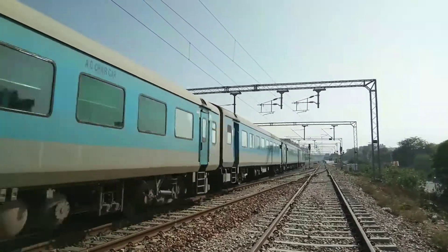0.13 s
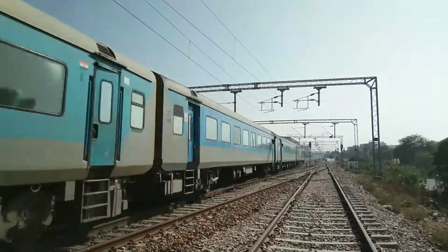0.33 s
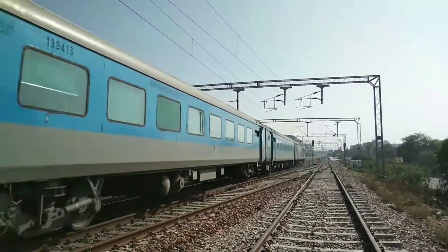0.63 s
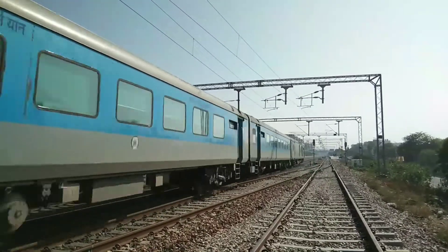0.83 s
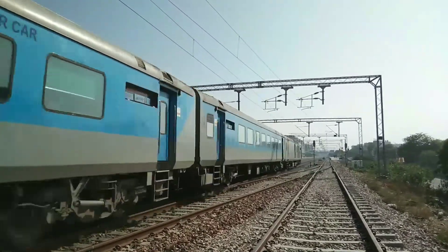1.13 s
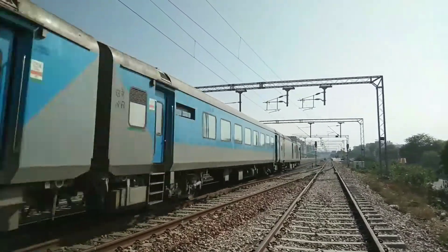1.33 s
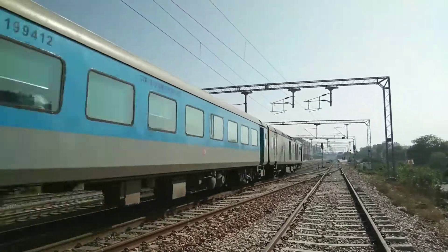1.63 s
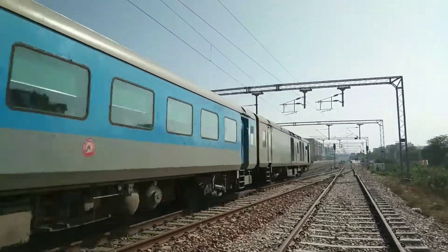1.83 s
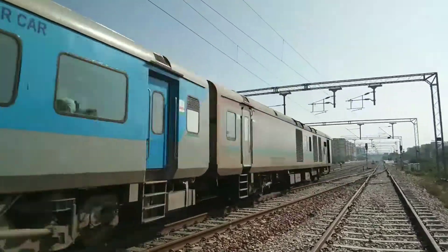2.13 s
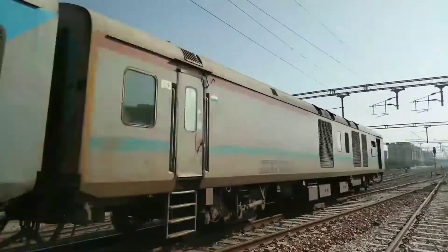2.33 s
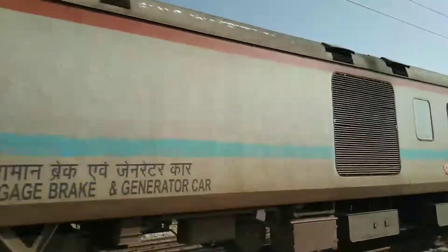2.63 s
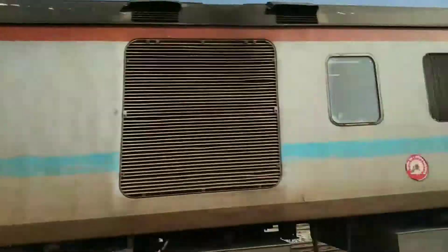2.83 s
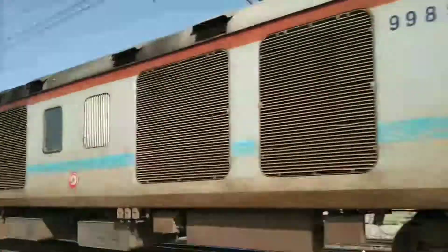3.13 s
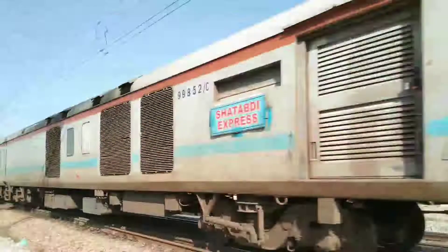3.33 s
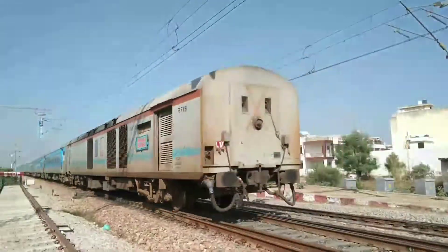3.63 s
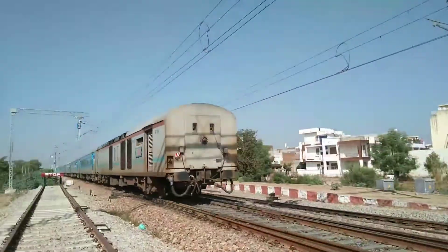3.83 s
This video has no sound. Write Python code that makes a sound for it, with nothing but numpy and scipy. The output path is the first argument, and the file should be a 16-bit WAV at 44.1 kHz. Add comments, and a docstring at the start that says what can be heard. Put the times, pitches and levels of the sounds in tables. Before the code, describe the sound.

A train passes close with a rolling roar, clattering wheels and short metallic squeals.

```python
"""Passenger train passing on open track.

The last coaches go by a few metres away. Each bogie swells the rumble and the roar of rough steel
rolling on the rail; wheels knock and the running gear rattles. Some wheels scrape the rail and sing,
their pitch lowered by the Doppler effect as they pass. All eases after the last car."""
import sys
import numpy as np
from scipy import signal
from scipy.fft import rfft, irfft
from scipy.io import wavfile
from scipy.ndimage import uniform_filter1d, map_coordinates

SR = 44100
rng = np.random.default_rng(int(sys.argv[2]) if len(sys.argv) > 2 else 0)


def wav_record(signal):
    """Record a signal, one row per channel, as 16-bit PCM in the file named by sys.argv[1]."""
    frames = np.transpose(np.atleast_2d(signal))
    bounded = np.clip(frames, -1, 1)
    # unit amplitude maps onto the largest positive 16-bit level
    quanta = np.round(bounded * 32767).astype(np.int16)
    wavfile.write(sys.argv[1], SR, quanta)


N = 176400
TIME, FREQ = np.arange(N) / SR, np.fft.rfftfreq(N, 1 / SR)
DOPPLER_FALL_PER_S = 0.29


# Vibration of coach bodies and bogies. Each row: time in seconds, relative level in dB.
COACH_LEVEL = [(0.0, -24), (0.07, -28), (0.93, -30), (0.96, -26), (1.61, -33), (1.65, -28.5), (3.5, -36),
               (4.0, -42)]
BOGIE_LEVEL = [(0.0, -33), (0.05, -22.5), (0.14, -33), (0.56, -19), (0.59, -24.5), (0.96, -20.5),
               (0.98, -25.5), (2.0, -27), (2.04, -33.5), (2.23, -22), (2.54, -27), (2.75, -21.5),
               (2.82, -25.5), (3.02, -31.5), (3.31, -20.5), (3.38, -32), (3.95, -44.5), (4.0, -39)]
# Their spectra. Each row: frequency in Hz, gain in dB.
COACH_SPECTRUM = [(15, -57), (35, -29), (48, -9), (60, -5), (85, 2), (110, -4), (160, -12.5), (400, -73)]
BOGIE_SPECTRUM = [(50, -45), (95, -9.5), (140, 1.5), (245, -1), (300, -6.5), (400, -15.5), (550, -24),
                  (1500, -81.5)]

def rumble():
    """Structural vibration: the coach bodies drone and each passing bogie swells the rumble."""
    coaches = steadied(noise(COACH_SPECTRUM), window_s=0.43) * level(COACH_LEVEL)
    bogies = steadied(noise(BOGIE_SPECTRUM), window_s=0.082) * level(BOGIE_LEVEL)
    return coaches + bogies * amp(-0.5)


# Rolling roar, treble sizzle and faint top fizz. Each row: time in seconds, relative level in dB.
ROAR_LEVEL = [(0.0, -40.5), (0.31, -39.5), (0.49, -37), (1.21, -40), (1.61, -42.5), (2.21, -39),
              (2.33, -42.5), (2.73, -41), (2.93, -40.5), (3.25, -39), (3.88, -45), (4.0, -47.5)]
SIZZLE_LEVEL = [(0, -44.5), (.4, -44), (.72, -47), (1.0, -41.5), (1.13, -49), (1.9, -40), (2.05, -46),
                (2.3, -38), (2.8, -40.5), (3.0, -52), (3.22, -48.5), (3.45, -51.5), (3.6, -54), (3.72, -56),
                (3.86, -72), (4, -49.5)]
FIZZ_LEVEL = [(0, -72), (.15, -65), (.6, -66), (.7, -77), (.83, -64), (1.1, -61), (1.85, -56.5),
              (2.05, -65), (2.85, -57), (3.0, -66.5), (3.12, -73.5), (3.21, -63.5), (3.35, -84),
              (3.41, -64), (3.62, -74), (3.75, -78), (3.89, -82), (4, -76)]
# Their spectra. Each row: frequency in Hz, gain in dB.
ROAR_SPECTRUM = [(150, 9.5), (400, -3.5), (650, 2.5), (1000, -4), (1400, -10), (2500, -18), (4000, -18),
                 (6000, -34.5), (16000, -73)]
SIZZLE_SPECTRUM = [(1000, -4.5), (2800, 0.5), (4000, -0.5), (4600, 1.5), (5300, -3.5), (6500, -17.5),
                   (8200, -28.5), (10000, -42), (15500, -47)]
FIZZ_SPECTRUM = [(4500, -16), (6300, 6), (8100, 5.5), (10300, -2.5), (11800, -2), (15500, 7.5)]

def rolling():
    """Roughness excitation: steel rolling on steel drives the rail over a broad band."""
    roar = (rattle() * amp(-4.5) + noise(ROAR_SPECTRUM, rail())) * level(ROAR_LEVEL)
    sizzle = noise(SIZZLE_SPECTRUM, rail()) * level(SIZZLE_LEVEL) * amp(-6)
    fizz = noise(FIZZ_SPECTRUM) * level(FIZZ_LEVEL) * flutter(depth_db=2, rate_hz=35)
    return (roar + sizzle + fizz) * flutter(depth_db=1.5, rate_hz=30)


def rattle(taps_per_s=110, spread_db=2):
    """Poisson impacts: loose running gear taps at random, each tap a decaying burst of noise."""
    taps = (rng.random(N) < taps_per_s / SR) * amp(spread_db * rng.random(N))
    shake = signal.fftconvolve(taps, burst(0, rise=1 / SR, hold=0, t60=0.031))[:N]
    return shaped(shake * rng.standard_normal(N), colour(ROAR_SPECTRUM) * rail())


# Peaks and dips of the rail's response. Each row: frequency in Hz, width in Hz, gain in dB.
RAIL_RESONANCES = [(1788, 100, 4), (2215, 37, -3), (2694, 67, 2.5), (3930, 160, -2), (4600, 170, -1.5)]

def rail():
    """Resonance: the rail lifts some narrow bands and weakens others."""
    return amp(sum(db / (1 + (2 * (FREQ - hz) / width) ** 2) for hz, width, db in RAIL_RESONANCES))


# Wheel impacts. Each row: start in seconds, relative level in dB, thud offset in dB,
# time for the clank to decay by 60 dB in seconds.
IMPACTS = [(0.038, -28.5, 13, 0.093), (.076, -28.5, 9, 0.074), (0.094, -26.5, -6, 0.042),
           (.18, -26, -4, 0.075), (.408, -25.5, 8.5, 0.25), (.499, -26.5, -12, 0.073),
           (0.543, -30, 18, 0.1), (0.635, -32.5, 5, .1), (0.828, -23.5, 1, 0.17), (.9, -33, 21, 0.12),
           (0.935, -26, 17.5, .14), (.954, -33.5, 20, 0.48), (1.024, -32.5, 19, 0.17),
           (1.063, -24.5, -1, 0.16), (1.256, -32, 10, .12), (1.32, -27.5, -9, 0.26),
           (1.388, -25.5, 7, 0.15), (1.414, -26.5, 9, .14), (1.487, -29.5, 17, 0.14),
           (1.742, -28.5, 15, 0.43), (1.83, -27, 15, 0.24), (1.874, -25.5, 8, .16), (1.957, -25, -10, 0.22),
           (2.216, -26, 8, 0.1), (2.297, -23.5, 6, 0.32), (2.389, -25, 14, 0.1), (2.409, -24, -7, .18),
           (2.623, -24, 0, 0.15), (2.654, -33, 13, .14), (2.723, -20.5, 14, .15), (2.771, -27, 13, 0.21),
           (2.868, -27.5, 3, 0.21), (2.918, -36.5, 12.5, 0.045), (3.034, -35.5, -12, .08),
           (3.132, -36, -3, 0.36), (3.193, -25, 14.5, 0.22), (3.28, -26.5, -1, 0.06),
           (3.3, -28, 15.5, 0.089), (3.587, -34.5, 9, 0.33), (3.706, -34, 6, 0.18), (3.896, -38.5, -4, .13)]
# Spectrum of the clank. Each row: frequency in Hz, gain in dB.
CLANK_SPECTRUM = [(150, -42), (400, 10.5), (800, 1.5), (1300, -4), (2300, -11), (4400, -15.5), (6500, -32),
                  (10000, -60), (16000, -49)]

def knocks(thud_hz=232.3, thud_spread=0.17):
    """Impact excitation: a wheel strikes, giving a clank in the rail and a thud in the track bed."""
    out, steel = np.zeros(N), noise(CLANK_SPECTRUM, rail())
    for start, db, thud_db, t60 in IMPACTS:
        at = slice(int(start * SR), int(start * SR) + SR // 2)
        t = TIME[at] - start
        clank = steel[at] * envelope(t, rise=0.0015, hold=0.0088, t60=t60)
        hz = thud_hz * np.exp(thud_spread * rng.standard_normal())
        thud = np.sin(2 * np.pi * hz * t) * envelope(t, rise=0.0049, hold=0.0049, t60=0.058)
        out[at] += clank * amp(db - 8) + thud * amp(db + thud_db - 3)
    return out


# Natural modes of a wheel. Each row: frequency in Hz, relative level in dB.
WHEEL_MODES = [(1870, -2), (2230, -1), (2520, -2.5), (2760, -2.5), (3620, 2.5), (3980, 4.5), (4700, 4.5),
               (5220, -5.5), (5650, -4), (6100, -7.5), (6600, -7), (7500, -16), (8250, -12.5), (9800, -18)]

def ringing(fall_per_s=0.15, spread=0.02, rolloff_hz=2620):
    """Free vibration: each knock leaves the lower wheel modes ringing briefly, sinking in pitch."""
    out, t = np.zeros(N + SR), TIME[:SR // 2]
    glide = np.cumsum(np.exp(-fall_per_s * t)) / SR
    fade = envelope(t, rise=0.008, hold=0, t60=0.28)
    for start, db, _, _ in IMPACTS:
        for hz, mode_db in WHEEL_MODES[:8]:
            detune, sine, cosine = rng.standard_normal(3)
            phase = 2 * np.pi * hz * (1 + spread * detune) * glide
            gain = amp(db + mode_db - 19) / (1 + (hz / rolloff_hz) ** 4)
            out[int(start * SR):][:len(t)] += gain * fade * (sine * np.sin(phase) + cosine * np.cos(phase))
    return out[:N]


def wheel(spread=0.012, relative_width=0.008):
    """Modal response: a sum of narrow resonances, with no two wheels tuned quite alike."""
    tuning = 1 + spread * rng.standard_normal(len(WHEEL_MODES))
    return sum(amp(db) / (1 + (2 * (FREQ / (hz * ratio) - 1) / relative_width) ** 2)
               for (hz, db), ratio in zip(WHEEL_MODES, tuning))


# Flange contacts. Each row: start in seconds, length in seconds, level in dB,
# hiss offset in dB, singing offset in dB.
FLANGE_CONTACTS = [(.215, 0.023, -51.5, -3, -7), (0.292, 0.21, -46, -5, -1.5),
                   (.97, 0.038, -50.5, -9, -0.5), (1.172, 0.21, -46, -1, -2), (1.473, 0.24, -45, -1, -4),
                   (2.085, 0.21, -43, -6, -1.5), (2.399, 0.045, -40.5, -16, -11),
                   (2.508, 0.016, -36.5, -11, -9), (2.556, .19, -45, -12, -1.5),
                   (2.802, 0.0096, -40, -13, -7), (3.5, 0.093, -57.5, -13, -1), (3.926, 0.078, -66, 0, -8)]
# Spectra of the rub and its top hiss. Each row: frequency in Hz, gain in dB.
RUB_SPECTRUM = [(900, -13), (1800, -3), (3000, -1), (4600, 5.5), (5500, -2), (6800, -8.5), (8200, -9),
                (10000, -23.5), (16000, -34)]
HISS_SPECTRUM = [(4000, -28), (7000, -2), (9500, -4), (10800, -7.5), (12200, -2), (14000, 3), (15500, 1.5)]

def scrapes(mode_gap_hz=170, ripple_db=3.8, sag_db_per_s=22):
    """Sliding friction: a flange rubs the rail, and the gritty rub sags as the wheel modes sing."""
    out, friction = np.zeros(N), noise(RUB_SPECTRUM, rail() ** 1.4)
    modes_hz = np.arange(0, SR / 2, mode_gap_hz)
    for start, length, db, hiss_db, sing_db in FLANGE_CONTACTS:
        ripple = amp(ripple_db * np.interp(FREQ, modes_hz, rng.standard_normal(len(modes_hz))))
        sag_db = sag_db_per_s * np.maximum(TIME - start, 0)
        rub = friction * burst(start, rise=0.012, hold=length, t60=0.14)
        hiss = passing(colour(HISS_SPECTRUM) * ripple, start)
        hiss *= burst(start, rise=0.038, hold=length, t60=0.25)
        sing = passing(wheel(), start) * burst(start, rise=min(0.075, length / 2), hold=length, t60=0.44)
        out += rub * amp(db - sag_db) + hiss * amp(db + hiss_db) + sing * amp(db + sing_db)
    return out * flutter(depth_db=0.94, rate_hz=60)


def passing(gain, start, settle_s=0.08):
    """Doppler effect: filtered noise eases into a steady fall in pitch as the wheel draws level."""
    t = TIME[:SR]
    pitch = np.exp(-DOPPLER_FALL_PER_S * (t - settle_s * (1 - np.exp(-t / settle_s))))
    emitted = shaped(rng.standard_normal(N), gain)[:SR]
    heard = map_coordinates(emitted, [np.cumsum(pitch)], order=3, mode="mirror")
    return placed(heard, start)


# Singing wheel modes. Each row: time of the peak in seconds, Gaussian width in seconds,
# frequency in Hz, level in dB.
WHISTLES = [(.41, .06, 4740, -50), (0.453, .06, 13850, -61), (.47, .06, 10020, -62),
            (1.239, 0.041, 4630, -41.5), (1.52, .03, 4650, -46.5), (1.57, .04, 11850, -53),
            (1.261, 0.11, 2794, -57), (1.269, .06, 1773, -53), (1.366, .06, 7680, -60),
            (1.6, 0.05, 2764, -51), (1.621, .07, 1814, -58), (1.63, 0.052, 13650, -56),
            (1.675, .065, 11600, -48.5), (1.69, 0.041, 5160, -51), (1.711, .04, 3800, -56),
            (1.7, .05, 7260, -58.5), (2.24, 0.076, 8100, -49), (2.182, 0.042, 4670, -45),
            (2.28, .06, 5410, -48.5), (2.25, 0.06, 6450, -57), (2.28, 0.045, 15150, -50),
            (2.535, 0.021, 1890, -45.5), (2.535, 0.016, 2720, -46), (2.662, .06, 7300, -60),
            (2.647, .05, 14900, -54), (2.67, 0.063, 4530, -45), (2.67, 0.039, 5320, -61),
            (3.6, 0.036, 4350, -50.5)]

def squeals(core_width=0.008, skirt_width=0.045):
    """Narrowband resonance: single wheel modes swell into rough whistles with a Doppler glide."""
    out = np.zeros(N)
    for peak, width, hz, db in WHISTLES:
        at = abs(TIME - peak) < 4 * width
        t = TIME[at] - peak
        glide_hz = hz * np.exp(-DOPPLER_FALL_PER_S * np.clip(t, -2 * width, 2 * width))
        carrier = np.exp(2j * np.pi * np.cumsum(glide_hz) / SR)
        offset = np.fft.fftfreq(SR, 1 / SR) / hz  # as a fraction of the mode frequency
        core = unit(1 / (1 + (offset / core_width) ** 4))
        skirt = unit(1 / (1 + (offset / skirt_width) ** 4)) * amp(-4)
        white = rng.standard_normal(SR) + 1j * rng.standard_normal(SR)
        roughness = np.fft.ifft(np.fft.fft(white) * (core + skirt))
        whistle = unit((np.resize(roughness, len(t)) * carrier).real)
        out[at] += whistle * amp(db) * np.exp(-0.5 * (t / width) ** 2)
    return out


def amp(db):
    """Decibels to gain."""
    return 10 ** (np.asarray(db) / 20)


def unit(x):
    """Normalisation to rms 1."""
    return x / np.sqrt(np.mean(x ** 2) + 1e-20)


def level(curve):
    """Gain interpolated over time."""
    return amp(np.interp(TIME, *np.transpose(curve)))


def colour(spectrum):
    """Gain interpolated over log frequency."""
    hz, db = np.transpose(spectrum)
    return amp(np.interp(np.log(FREQ + 1), np.log(hz), db))


def shaped(x, gain):
    """Linear filtering by a gain over frequency, at rms 1."""
    return unit(irfft(rfft(x) * gain, N))


def noise(spectrum, resonance=1):
    """White noise filtered by a spectrum table and a resonant response."""
    return shaped(rng.standard_normal(N), colour(spectrum) * resonance)


def flutter(depth_db, rate_hz):
    """Amplitude modulation: a gain that wanders at random up to a rate."""
    return amp(depth_db * shaped(rng.standard_normal(N), 1 / (1 + (FREQ / rate_hz) ** 4)))


def steadied(x, window_s):
    """Division by the running rms evens out slow swells."""
    return x / np.sqrt(abs(uniform_filter1d(x ** 2, int(window_s * SR))) + 1e-9)


def envelope(t, rise, hold, t60):
    """Linear attack, hold and exponential decay, timed in seconds."""
    return np.clip(t / rise, 0, 1) * np.exp(-np.log(1000) * np.maximum(t - hold, 0) / t60)


def placed(x, start):
    """Delay to a start time in seconds."""
    return np.pad(x, (int(start * SR), N))[:N]


def burst(start, rise, hold, t60):
    """The envelope of one event at its start time."""
    return placed(envelope(TIME[:SR], rise, hold, t60), start)


def scene():
    """Superposition: all sources add at one microphone beside the track."""
    return (rumble() + rolling() + knocks() + ringing() + scrapes() + squeals())[None]


def record(dry, fade_s=0.005, cutoff_hz=15600):
    """Band limiting: a low-pass filter removes the highest treble, and the ends fade softly."""
    ends = np.sin(np.pi / 2 * np.clip(np.minimum(TIME, TIME[::-1]) / fade_s, 0, 1)) ** 2
    lowpass = signal.firwin(511, cutoff_hz, window=("kaiser", 9), fs=SR)
    return signal.oaconvolve(dry * ends, lowpass[None], "same")


dry = scene()
out = record(dry)
wav_record(out)
```